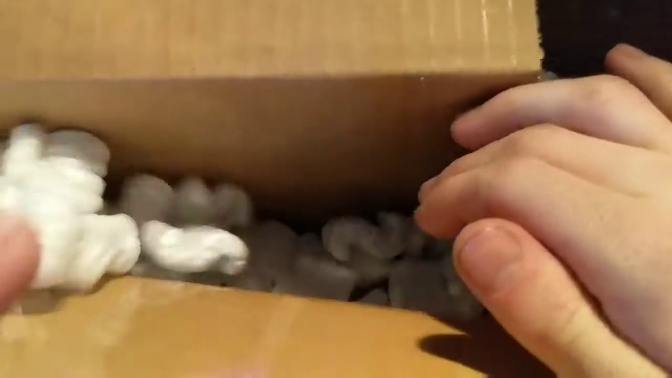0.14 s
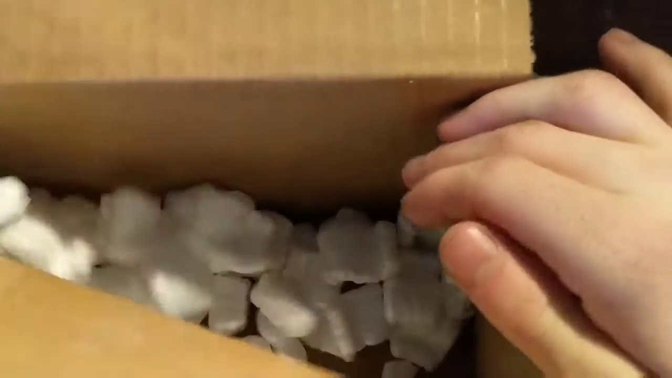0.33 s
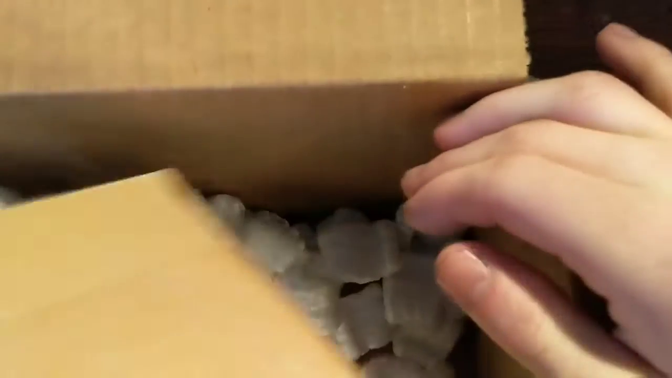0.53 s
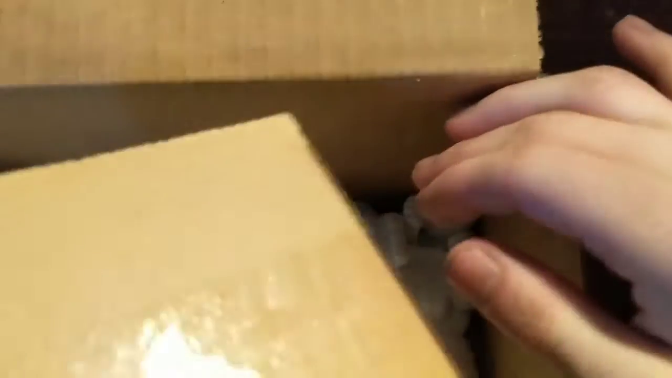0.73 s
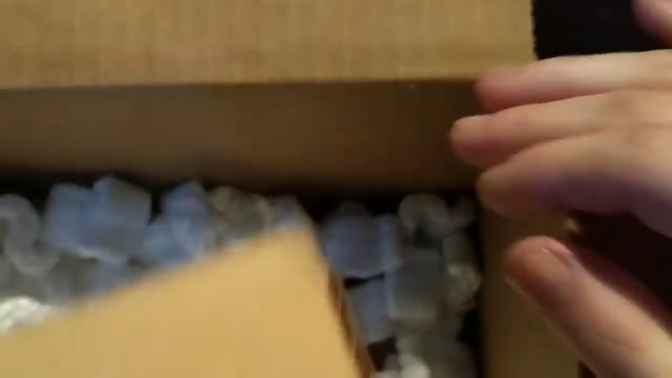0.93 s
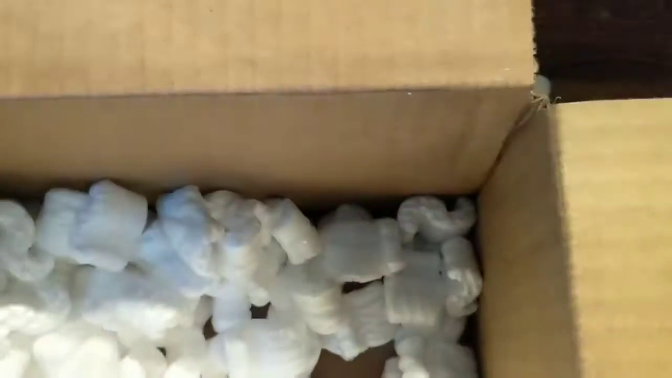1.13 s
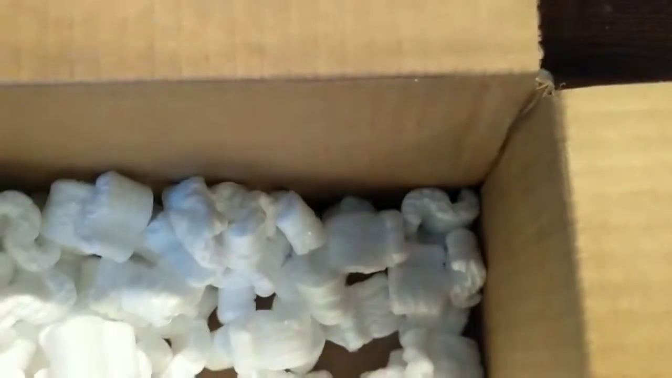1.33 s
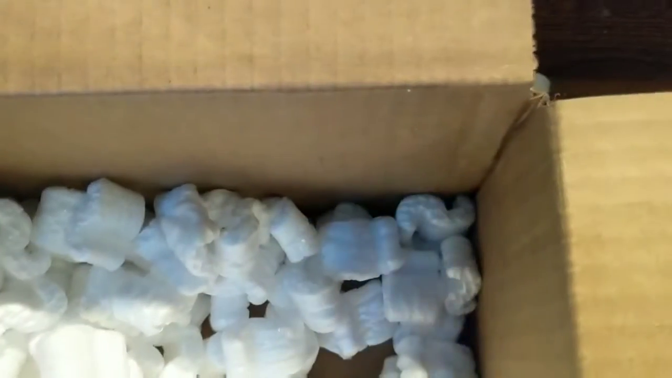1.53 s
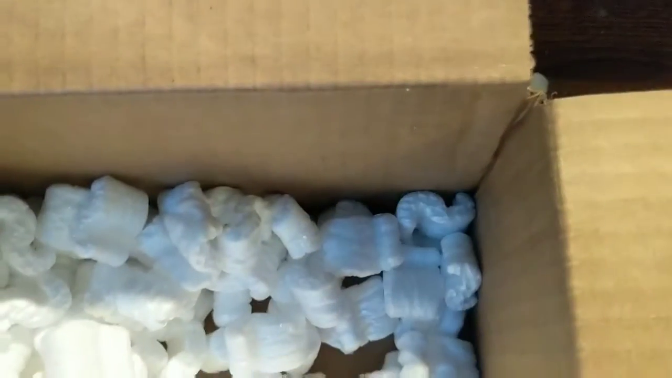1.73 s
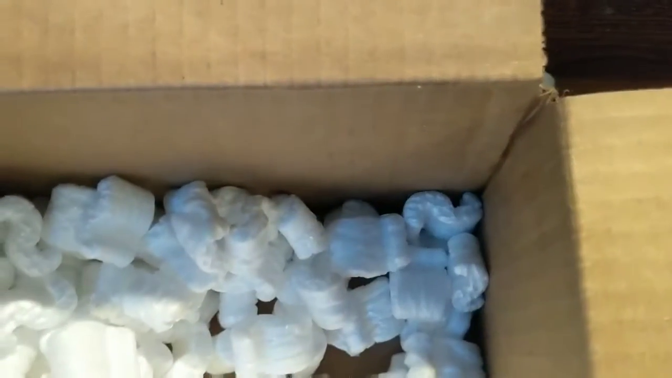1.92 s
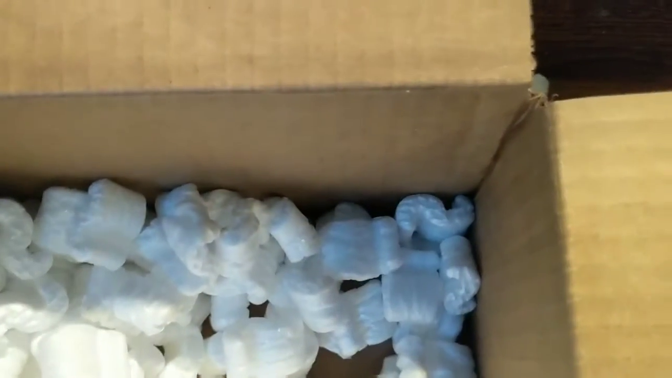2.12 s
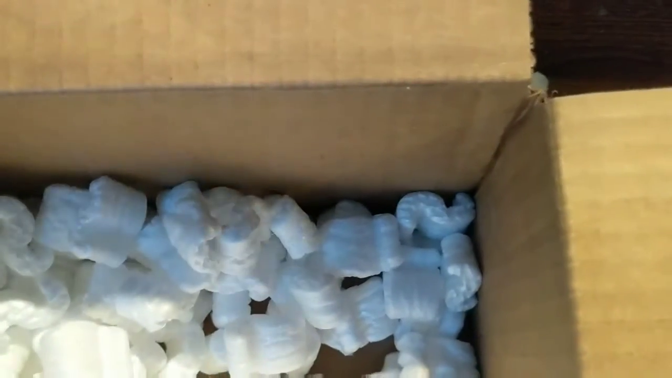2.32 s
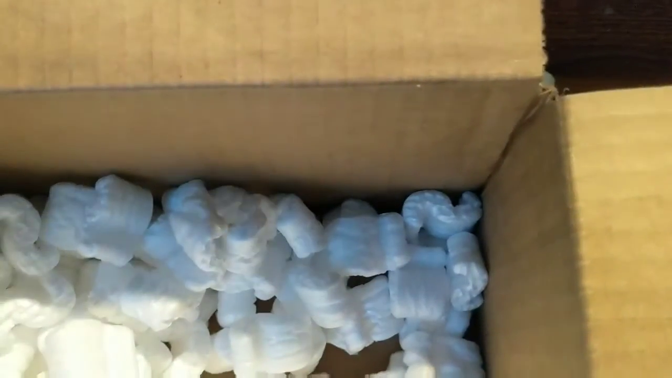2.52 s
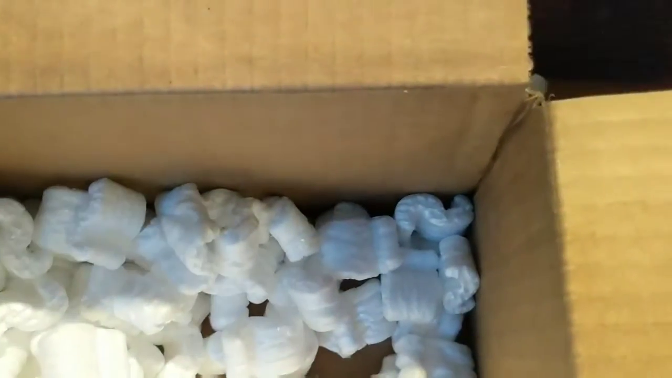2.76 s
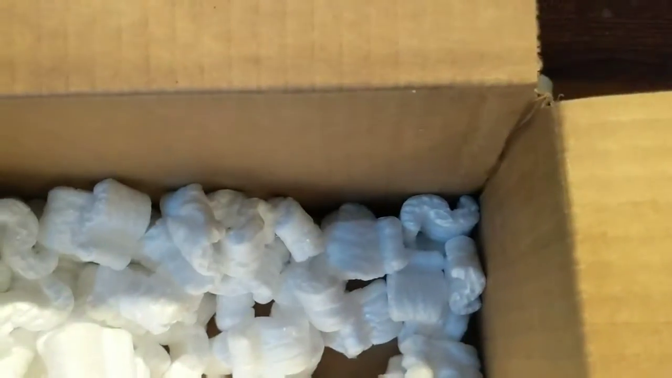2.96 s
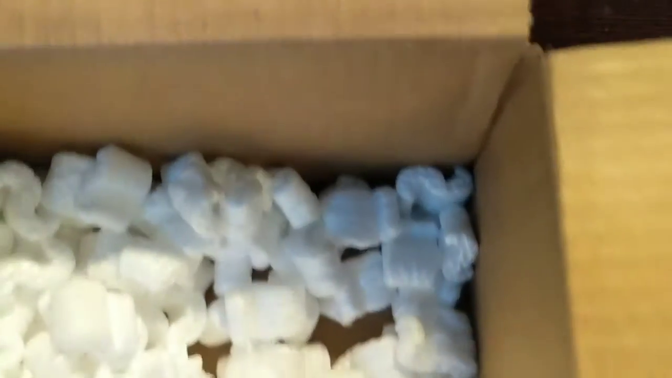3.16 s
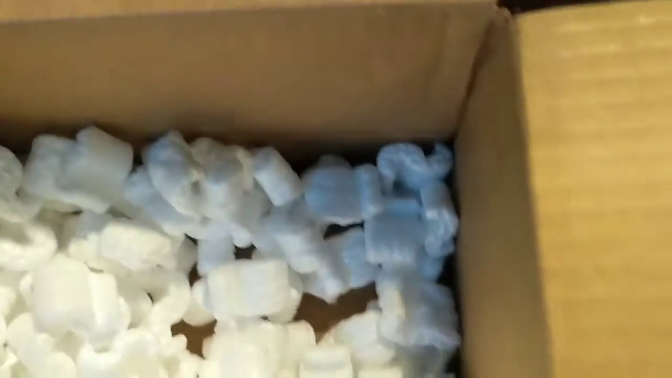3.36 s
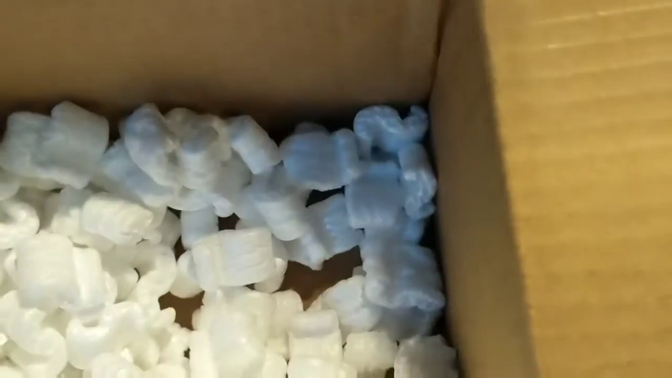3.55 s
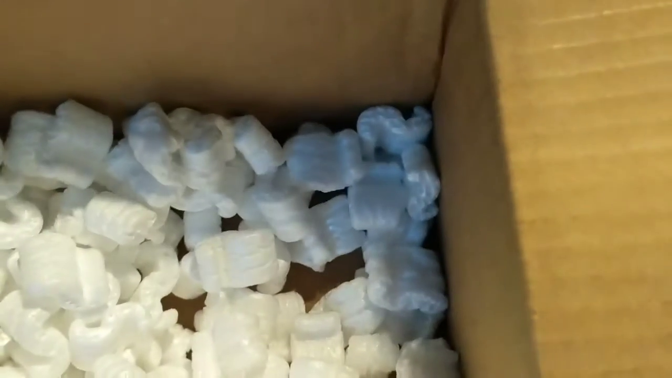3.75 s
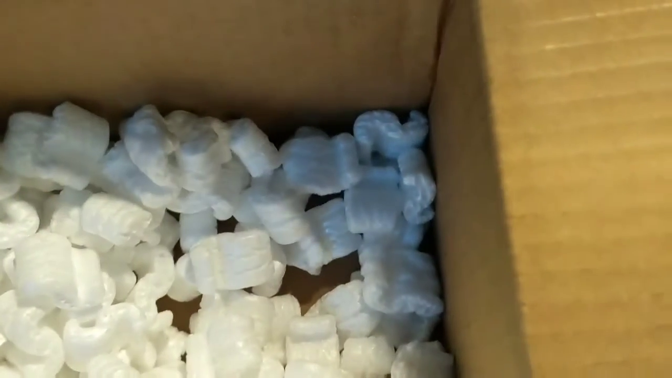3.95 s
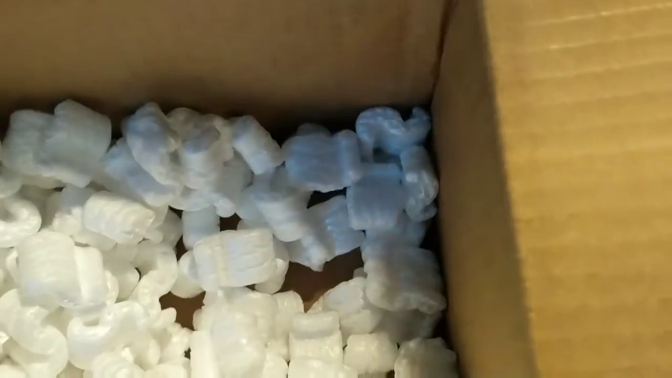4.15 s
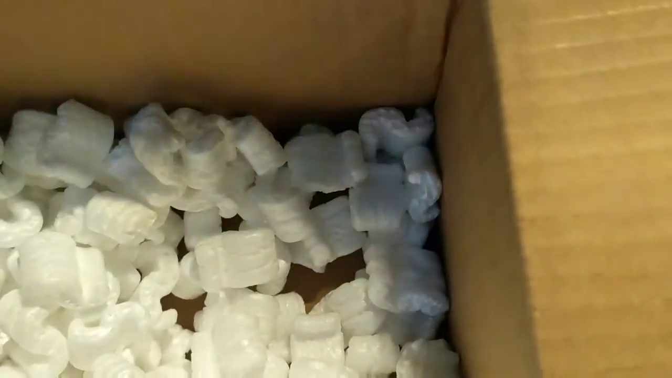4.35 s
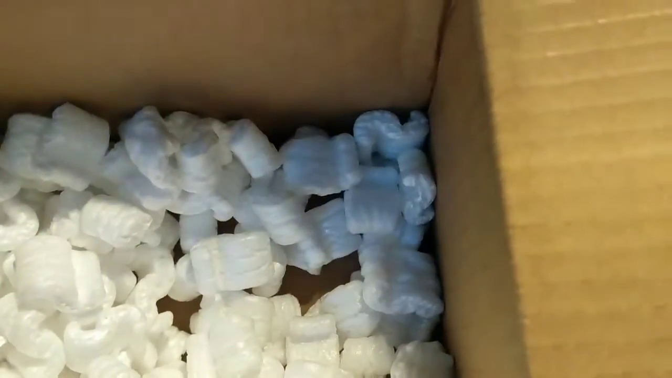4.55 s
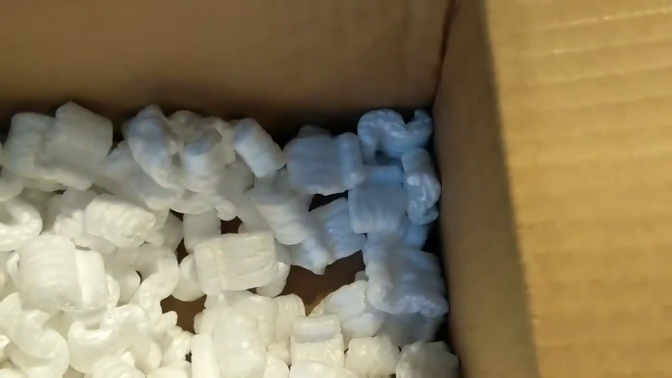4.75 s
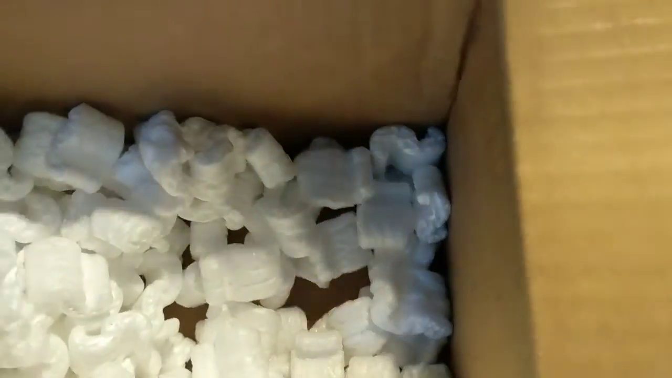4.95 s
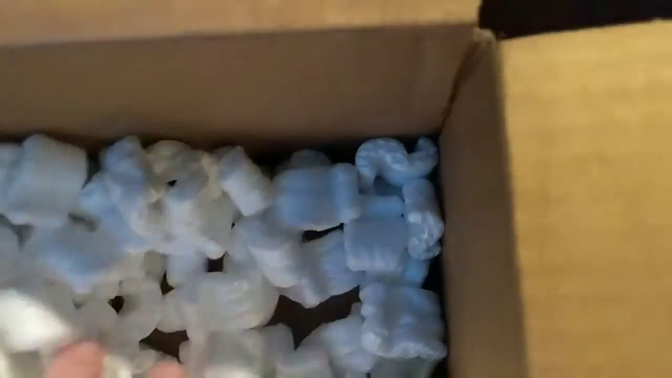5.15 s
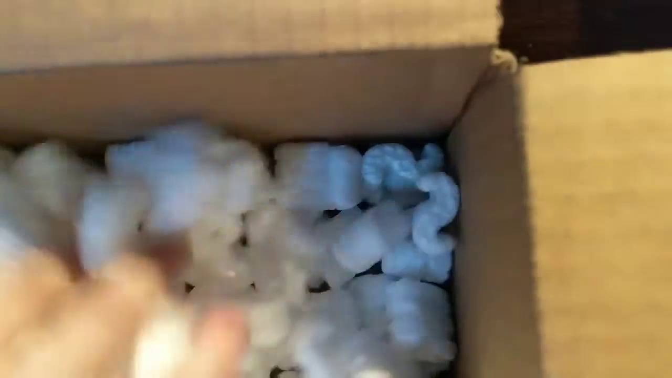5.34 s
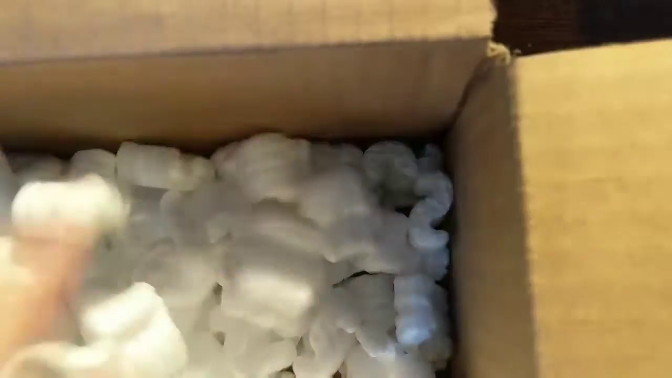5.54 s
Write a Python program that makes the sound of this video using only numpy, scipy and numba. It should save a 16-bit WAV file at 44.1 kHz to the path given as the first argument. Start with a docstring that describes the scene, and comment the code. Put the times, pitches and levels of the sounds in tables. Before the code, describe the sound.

Close to the microphone in a quiet room, a hand scoops foam packing peanuts with dense crackling and squeaks, then a cardboard flap moves with dull knocks. Sound thins to faint ticks of settling pieces over low room hush. Past three seconds the box shifts with low thumps; near five the hand returns, bright rustle swelling to loud crunching, snaps and knocks.

```python
"""Stirring foam pieces in a cardboard box

A hand stirs foam packing peanuts in a cardboard box, heard from close by in a quiet room.
Foam rubbing on foam is a dense sum of decaying stick-slip sines; snaps, squeaks and knocks are
bursts of band-limited noise; the walls are low damped resonances driven by uneven pushes.
A steady hush and a short, dull reverberant tail make up the room."""
import sys
import numpy as np
from scipy import signal
from scipy.fft import rfft, irfft
from scipy.io import wavfile
from scipy.ndimage import uniform_filter1d
from numba import njit

SR = 44100
rng = np.random.default_rng(int(sys.argv[2]) if len(sys.argv) > 2 else 0)


def output_pcm(signal):
    """Save a mono or channel-first signal as 16-bit PCM at the path in sys.argv[1].

    Samples are clipped to [-1, 1] before scaling.
    """
    pcm = np.clip(np.atleast_2d(signal).T, -1, 1) * 32767
    wavfile.write(sys.argv[1], SR, np.round(pcm).astype(np.int16))


def ratio_of_db(decibels):
    """Turn decibels (scalar or array-like) into linear amplitude factors; 0 dB maps to 1."""
    return 10 ** (np.asarray(decibels, float) / 20)


N = 250488
T = np.arange(N) / SR

# Spectrum of the room's hush: (frequency [Hz], relative level per Hz [dB])
HUSH_SPECTRUM = [(18, -21), (30, 2), (134, 4), (189, 1.5), (328, -1), (1350, -10.5), (1720, -10.5),
                 (2980, -14.5), (6210, -22), (12000, -18.5), (16000, -21.5)]
# Resonances of the flexing walls: (frequency [Hz], width [Hz], relative level [dB])
WALL_MODES = [(117, 57, -3.5), (137, 34, -8.5), (175, 28, 2.5), (207, 38, 0)]
# Resonances of the whole box rocking on the table: (frequency [Hz], width [Hz], relative level [dB])
ROCKING_MODES = [(58, 14, -4), (80, 11, -4)]
# Course of the rocking: (time [s], level [dB])
ROCKING_LEVEL = [(0.0, -61), (0.55, -48), (0.68, -60.5), (2.89, -74.5), (3.15, -54.5), (3.24, -33.5),
                 (3.39, -46.5), (3.64, -44.5), (3.81, -55), (3.97, -41), (4.0, -51), (4.68, -74),
                 (4.78, -48), (4.84, -56), (4.98, -35), (5.03, -59), (5.09, -37), (5.16, -47), (5.6, -37),
                 (5.68, -63)]
# Blows that shake the walls: (time [s], level [dB], pitch [Hz])
WALL_BLOWS = [(0.096, -39, 177), (.27, -34, 66), (0.403, -28, 154), (0.464, -21.5, 183),
              (0.488, -21.5, 175), (0.508, -18.5, 137), (0.523, -30, 101), (1.044, -43.5, 122),
              (1.089, -40, 207), (1.114, -38.5, 150), (1.531, -46, 132), (1.674, -56, 290),
              (3.051, -45, 101), (3.164, -38, 175), (3.188, -33, 87), (3.218, -23.5, 140), (3.234, -17, 78),
              (3.3, -36, 72), (3.603, -26, 207), (3.611, -19.5, 135), (3.655, -31, 149), (3.859, -34, 56.5),
              (3.948, -28, 74.5), (3.96, -33.5, 188), (4.035, -41, 130), (4.189, -52, 100),
              (4.282, -41, 59.2), (4.759, -36, 77), (4.88, -40, 80), (4.948, -33, 70.5), (5.064, -28, 95),
              (5.089, -28, 64.6), (5.278, -19.5, 197.5), (5.424, -17, 213), (5.47, -21, 304)]
# Spectral weighting of scraped cardboard: (frequency [Hz], relative level per Hz [dB])
CARD_SPECTRUM = [(140, -39), (230, -2.5), (392, 3.5), (446, 2.5), (646, 0), (1020, -3), (1430, -5),
                 (1800, -19.5), (2340, -27), (3960, -120)]
# Knocks on the cardboard: (time [s], peak [dB], centre frequency [Hz], width [octaves])
CARD_KNOCKS = [(0.173, -31, 1150, 0.38), (0.366, -26, 1410, 0.29), (0.45, -39, 493, 0.45),
               (0.487, -32, 495, 0.77), (0.535, -21, 650, 0.9), (0.575, -40, 318, 0.45),
               (0.605, -34, 393, 0.49), (0.643, -36, 568, 0.52), (0.691, -22.5, 1040, 0.28),
               (0.792, -32, 375, 0.81), (0.854, -34.5, 266, 0.45), (0.883, -43, 299, 0.49),
               (0.923, -45, 261, 0.41), (0.982, -45, 620, 0.61), (1.079, -49, 1150, 0.54),
               (1.115, -40, 460, 0.38), (1.171, -53, 455, 0.45), (1.23, -58, 470, 0.45),
               (1.534, -34, 925, 0.61), (1.677, -45, 424, 0.35), (1.793, -41, 1050, 0.66),
               (1.848, -42.5, 910, 0.51), (2.27, -32, 745, 0.38), (2.336, -41, 1540, 0.49),
               (2.357, -41, 806, 0.42), (2.396, -35.5, 850, 0.23), (2.492, -43, 1540, 0.58),
               (2.732, -44, 767, 0.4), (3.053, -45.5, 363, 0.62), (3.164, -44, 377, 0.35),
               (3.192, -42, 706, 0.45), (3.215, -31, 1410, 0.88), (3.42, -35, 361, 0.33),
               (3.521, -34, 247, 0.26), (3.603, -18.5, 394, 0.2), (3.76, -37, 363, 0.23),
               (3.944, -29.5, 350, 0.61), (4.041, -41.5, 368, 0.53), (4.091, -46, 360, 0.33),
               (4.731, -44.5, 533, 0.34), (4.79, -32.5, 1240, 0.28), (4.836, -37, 471, 0.28),
               (4.917, -25, 526, 0.23), (5.065, -43, 522, 0.29), (5.104, -33.5, 373, 0.53),
               (5.167, -42, 371, 0.45), (5.225, -33, 366, 0.41), (5.282, -17, 367, 0.38),
               (5.341, -13, 1060, 0.56), (5.373, -14.5, 670, 0.86), (5.425, -19.5, 720, 0.38),
               (5.48, -17, 363, 0.73), (5.505, -17, 630, 0.2), (5.532, -15, 740, 0.57),
               (5.566, -18, 533, 0.55), (5.582, -19, 480, 0.45)]
# Foam squeaking on one pitch: (time [s], peak [dB], centre frequency [Hz], t60 [s])
FOAM_SQUEAKS = [(.09, -28, 7870, 0.35), (.115, -27.5, 3620, 0.24), (.12, -29.5, 2850, 0.23),
                (.2, -26, 7800, .5), (.33, -21.5, 7740, 0.23), (.32, -23, 6540, 0.34),
                (0.173, -26, 1183, 0.029), (0.541, -27.5, 3310, 0.058), (.583, -36, 3820, 0.078),
                (.688, -38, 2900, 0.083), (.688, -38, 3620, 0.11), (.739, -41, 1840, 0.024),
                (.792, -41.5, 4700, 0.054), (.882, -39.5, 1104, 0.021), (1.045, -50, 3720, .083),
                (1.175, -49, 471, 0.21), (1.226, -48, 472, 0.13), (1.335, -55, 5100, .076),
                (1.426, -56, 7330, .092), (1.536, -48, 4580, .05), (3.722, -38.5, 1360, 0.045),
                (4.091, -48.5, 369, 0.11), (3.9, -35, 6350, .06), (4.83, -27, 6800, 0.14),
                (4.845, -25, 7900, 0.14), (5.345, -19, 3570, 0.11), (5.41, -20, 6900, .15),
                (5.504, -25, 6500, .027), (5.533, -26, 3200, .04), (5.563, -20.5, 5300, 0.014)]
# Wide snaps: single foam pieces slipping and, in the rows centred low (about 1-2 kHz), ticks on the cardboard:
# (time [s], peak [dB], centre frequency [Hz], width [octaves], t60 [s])
SNAPS = [(0.1024,-15.5,8100,1.5,.02),(.1455,-20,6000,1.5,.015),(.3505,-13,7100,1.5,.02),(0.5435,-22,3400,2.3,.03),(0.5855,-15,9500,1.2,.011),(.6063,-19,5000,4.4,0.045),
         (.6433,-25,9590,3.4,0.088),(.6548,-18.5,9540,2,0.0063),(0.6804,-27,1500,2.6,0.044),(0.7835,-30,3000,4.2,0.053),
         (0.8382,-34,11000,3,0.072),(.8837,-36,1200,1.7,0.12),(0.9794,-41,1200,1.1,0.04),(1.0122,-45,1400,1.7,.07),(1.0461,-47,3560,1.5,.08),
         (1.08,-32.5,1500,1.7,0.047),(1.117,-27,1500,1.16,.012),(1.2306,-41,2000,3,0.093),(1.324,-36.5,8480,1.6,0.033),
         (1.3423,-44,7970,1.4,.034),(1.4117,-41.5,7550,1.9,0.011),(1.4244,-47,7300,1.4,0.076),(1.5328,-37,3000,2.5,.05),
         (1.5378,-36,1010,1,0.025),(1.6763,-46.5,1500,1,0.083),(1.9019,-49,1530,1.7,.018),(2.0056,-44,8510,2.6,.011),
         (2.0229,-45.5,2500,1.8,0.018),(2.043,-45,12800,3.3,0.022),(2.0868,-42,1530,2.1,0.0081),(2.1363,-41,1980,1.7,0.013),
         (2.27,-29.5,1500,2.5,0.073),(2.3373,-33,3000,3,0.069),(2.3689,-26,4030,1.5,.065),(2.3932,-29.5,4770,1.3,0.099),
         (2.499,-39,1500,3.1,0.17),(2.5909,-42,2780,2.4,0.067),(2.6506,-42.5,3920,1,.025),(2.7084,-33.5,8830,1.6,0.014),
         (2.732,-39,1450,2.2,.025),(2.7694,-52,4930,1.3,.028),(2.9088,-50,9570,2.4,0.015),(2.9404,-30.5,10600,1.7,0.013),
         (3.0532,-39,2500,3.3,0.083),(3.2156,-29,1800,1.7,0.026),(3.2288,-28,2300,1.5,0.033),(3.2425,-22,1860,0.28,.018),(3.2522,-28,2260,0.3,0.036),
         (3.4294,-30.5,1220,0.87,0.12),(3.5875,-11.5,4030,.6,0.011),(3.6468,-30,3000,3.2,0.21),(3.7582,-31,3000,2.3,0.062),
         (3.778,-32,1930,2.5,0.017),(3.9022,-30,6590,1.9,0.069),(3.936,-29,2000,3,.072),(4.0547,-45,3000,3.5,.12),
         (4.2732,-54,10000,2,.03),(4.3275,-51,10000,2.5,0.065),(4.5137,-50.5,9660,1.6,.1),(4.5538,-34.5,10900,.9,0.0077),
         (4.6008,-41,12300,1.7,0.047),(4.6244,-42.5,14000,1.8,0.079),(4.73,-28,12000,1.7,.012),(4.7893,-28,9770,1.5,.05),
         (4.8455,-11,11400,1.8,0.17),(4.915,-16,9750,3.3,0.07),(4.9527,-24,8890,2.4,.015),(4.9704,-26,9510,2.2,0.036),
         (5.0045,-26,9690,1.3,0.023),(5.0346,-31.5,9350,3,0.042),(5.0666,-24,2500,2.4,0.013),(5.0837,-27,1820,2.4,0.013),
         (5.1049,-23.5,1300,0.95,0.027),(5.1614,-29,1240,1.1,0.12),(5.1878,-20,10000,2.2,0.13),(5.2081,-12.5,10800,2.3,0.17),
         (5.2835,-5,1060,0.49,0.011),(5.3427,-3,6370,0.83,0.014),(5.364,-18,9530,2.1,0.057),(5.3745,-12,4500,2,0.014),(5.428,-12,5000,2.5,0.013),(5.4805,-9,3000,2.5,.02),(5.505,-14,2000,3.3,0.016),
         (5.5336,-10.5,9000,2.5,0.015),(5.5643,-13,5280,1.8,0.011),(5.6332,-22.5,1500,2.4,.034),(5.6487,-22,11200,2.3,0.12)]
# Spectral weighting of rubbed foam: (frequency [Hz], relative level per Hz [dB])
FOAM_SPECTRUM = [(700, -18), (1200, -10), (2400, -5), (3500, -5.5), (5000, -5.5), (7000, -5), (10000, -4),
                 (16500, -8.5)]
# The heap settling while no hand is in it:
# (start [s], length [s], foam level [dB], pressure on the box [dB])
SETTLINGS = [(1.292, 0.036, -61, -64), (1.404, 0.037, -70, -76), (1.516, 0.019, -55, -47),
             (1.658, 0.086, -61.5, -58), (1.755, .11, -54.5, -58), (2.0, 0.14, -69, -69),
             (2.255, 0.013, -45.5, -51), (2.339, 0.065, -46, -57), (2.45, 0.14, -57, -68),
             (2.639, 0.13, -56, -66.5), (2.89, 0.087, -57.5, -64), (3.033, 0.096, -59, -62.5),
             (4.1, 0.15, -69, -64.5), (4.258, 0.079, -65, -65.5), (4.488, 0.19, -62, -68),
             (4.674, .03, -68, -61)]
# The hand's work, one table a gesture (scoop, flap lifted, flap dropped, box shifted, box let go,
# hand lands, gropes, digs): (time [s], foam stirred [dB], box pressed [dB])
GESTURES = [
    [(0.0, -36, -37), (0.112, -24.5, -37.5), (0.19, -29, -36.5), (0.232, -23, -33.5), (0.29, -27.5, -35.5),
     (0.362, -23, -35), (0.408, -24, -33), (0.425, -34.5, -43)],
    [(0.43, -33.5, -45), (0.472, -34, -36.5), (0.618, -42.5, -40), (0.632, -36.5, -44.5),
     (0.698, -39.5, -34.5), (0.738, -46, -50.5), (0.928, -49, -52.5), (0.96, -51, -60)],
    [(0.965, -60, -65), (0.991, -55.5, -54), (1.037, -56.5, -63), (1.123, -48.5, -44), (1.157, -49.5, -59),
     (1.251, -57, -56.5), (1.261, -66, -61), (1.3, -58, -81)],
    [(3.15, -59, -67), (3.194, -51.5, -51.5), (3.244, -33, -37), (3.296, -43, -43), (3.368, -46, -50),
     (3.436, -41.5, -38), (3.58, -44, -47), (3.585, -28, -36)],
    [(3.59, -30, -58), (3.602, -43, -43.5), (3.714, -50.5, -50), (3.722, -47, -50.5), (3.926, -47, -53.5),
     (3.944, -41.5, -38), (4.024, -56.5, -56), (4.12, -67, -60)],
    [(4.715, -47, -63), (4.797, -31, -46), (4.823, -34, -52), (4.841, -26.5, -47), (4.859, -33, -42),
     (4.907, -31.5, -50.5), (4.923, -33, -38), (4.94, -42, -48)],
    [(4.945, -42.5, -45), (5.007, -42.5, -46), (5.059, -54, -57), (5.065, -46, -51), (5.093, -47, -47),
     (5.105, -37.5, -41), (5.139, -52, -50), (5.16, -50, -43)],
    [(5.165, -40, -34.5), (5.223, -28.5, -32.5), (5.293, -22.5, -31), (5.329, -25.5, -42),
     (5.343, -18, -29.5), (5.411, -19.5, -30.5), (5.485, -22, -25), (5.68, -41.5, -42)],
]
# Tilt of the rustle in each gesture: (slope [dB per octave]); fingers in the foam are bright,
# a shifted heap dull
GESTURE_SLOPES = [-1.5, -1, -2.5, -5, -2, 0.7, -3.5, 0.14]
# Response of the microphone and its port: (frequency [Hz], gain [dB])
MIC_RESPONSE = [(25, -12), (55, -2.5), (3000, -2.5), (6800, 1.5), (7750, 3), (8500, -3), (15300, -6),
                (15900, -10), (16200, -60)]


def amp_response(hz, points):
    """A spectral weighting is linear in dB over the logarithm of frequency."""
    table_hz, db = np.transpose(points)
    return ratio_of_db(np.interp(np.log(hz), np.log(table_hz), db))


def response(x, points):
    """A linear filter multiplies each spectral component by its gain."""
    f = np.maximum(np.arange(x.shape[-1] // 2 + 1) * SR / x.shape[-1], 1)
    return irfft(rfft(x) * amp_response(f, points), x.shape[-1])


def colour(x, points):
    """Filtering colours a noise; division by its rms then sets unit power."""
    y = response(x, points)
    return y / np.sqrt(np.mean(y ** 2))


def walk(rate):
    """Irregular motion as random levels held for 1 / rate seconds and smoothed twice."""
    k = int(SR / rate)
    held = np.repeat(rng.standard_normal(N // k + 1), k)
    return 0.47 * uniform_filter1d(uniform_filter1d(held, k), k)[:N]


@njit
def grains(start, hz, fade, size, n):
    """A released slip rings as a sine with exponential decay: `fade` nepers per sample."""
    out = np.zeros(n + 4000)
    for g in range(len(start)):
        turn = np.exp(complex(-fade[g], 2 * np.pi * hz[g] / SR))
        z = complex(size[g], 0.)
        for i in range(min(int(6 / fade[g]), 3999)):
            z *= turn
            out[start[g] + i] += z.imag
    return out[:n]


def slips(count, lo_hz, hi_hz, points, cycles, spread_db, flurry_db, piece_db, tilt):
    """Stick-slip friction is a sum of many brief releases, a few far larger than the rest."""
    when, where, ring, big = rng.random((count, 4)).T
    start = (when * N).astype(np.int64)
    hz = lo_hz + where * (hi_hz - lo_hz)
    fade = hz / SR / (cycles * 4 ** (2 * ring - 1))
    # slips come in quick flurries, and each rubbing piece favours its own pitch for a while
    walks = np.array([walk(25) for _ in range(16)])
    pieces = walks[(16 * where ** .7).astype(int), start]
    db = -spread_db * np.log(1 - big) + flurry_db * walk(120)[start] + piece_db * pieces
    even = ratio_of_db(db) * np.sqrt(fade)  # equal energy for long and short rings
    lean = ratio_of_db(tilt[start] * np.log2(hz / hi_hz * 3))
    y = response(grains(start, hz, fade, even * lean, N), points)
    # a decaying sine holds size ** 2 / (4 fade); the tilt is left out of this power
    plain = np.sum(even ** 2 / fade)
    power = plain / N * np.mean(amp_response(hz, points) ** 2) / 4
    return y / np.sqrt(power)


def bursts(rows, widths, t60s, rises, crack):
    """An impact excites a band of noise that rises and decays; a sudden one opens with a crack."""
    size, crack_rise_s = 8192, 0.0012
    out = np.zeros(N + size)
    t = np.arange(size) / SR
    octave = np.log2(np.maximum(np.arange(size // 2 + 1) * SR / size, 1))
    noises = rng.standard_normal((len(rows), size))
    for (s, db, hz), width, t60, rise, noise in zip(rows, widths, t60s, rises, noises):
        band = np.exp(-.5 * ((octave - np.log2(hz)) / max(width, .03)) ** 2)
        tone = irfft(rfft(noise) * band)
        click = np.roll(irfft(band), 8)
        shape = (1 - np.exp(-t / max(rise, 1e-4))) * 1000. ** (-t / max(t60, .003))
        heard = np.sqrt(np.sum((tone * shape) ** 2) / np.sum(shape ** 2))  # rms of the part that sounds
        suddenness = np.exp(-(rise / crack_rise_s) ** 2)
        sound = tone / heard * shape / shape.max()
        sound = sound + crack * suddenness * click / click.max() * (t < .002)
        i = int(s * SR)
        out[i:i + size] += ratio_of_db(db) * sound / np.abs(sound).max()
    return out[:N]


def sway(modes, push_db):
    """Uneven pushes excite a few low, damped modes, each a resonant filter applied twice."""
    push, out = rng.standard_normal(N) * ratio_of_db(2.15 * walk(25)), 0
    for hz, width, db in modes:
        b, a = signal.iirpeak(hz, hz / width, SR)
        out = out + ratio_of_db(db) * signal.lfilter(b, a, signal.lfilter(b, a, push))
    return out / out.std() * ratio_of_db(push_db)


def motion():
    """Powers add: gestures and settlings give foam and pressure levels [dB] and a tilt [dB/octave]."""
    settle_rise_s, settle_fall_db_per_s = 0.023, 207
    power, tilt = np.full((2, N), 1e-9), -3  # the tilt between gestures
    for gesture, lean in zip(GESTURES, GESTURE_SLOPES):
        s, *columns = np.transpose(gesture)
        power = power + [ratio_of_db(np.interp(T, s, c, -120, -120)) ** 2 for c in columns]
        tilt = np.where((T >= s[0]) & (T <= s[-1]), lean, tilt)
    for s, length, *db in SETTLINGS:
        rise = np.clip((T - s) / settle_rise_s, 0, 1)
        shape = rise * ratio_of_db(-settle_fall_db_per_s * np.maximum(T - s - length, 0))
        power = power + np.outer(ratio_of_db(np.array(db)), shape) ** 2
    # levels are averaged over 10 ms, so stretches join smoothly
    foam_db, press_db = 10 * np.log10(uniform_filter1d(power, size=SR // 100) + 1e-10)
    return foam_db, press_db, tilt


def room_hush():
    """The background is stationary coloured noise whose level wanders slowly about -59.5 dB."""
    return colour(rng.standard_normal(N), HUSH_SPECTRUM) * ratio_of_db(-59.5 + 1.5 * walk(3.26))


def room(x):
    """Reverberation is convolution with an exponentially decaying noise: a short, dull tail."""
    t60_s, echo_db = 0.22, -15.5
    t = T[:SR // 2]
    noise = colour(rng.standard_normal(len(t)), [(100, 2.0), (2000, 3), (16000, -4)])
    tail = noise * 1000. ** (-t / t60_s) * (t > .004)
    return x + ratio_of_db(echo_db) * signal.fftconvolve(x, tail / np.sqrt(np.sum(tail ** 2)))[:N]


def walls(press_db):
    """Forced modes flex the walls and rock the box; each blow adds a freely decaying swing."""
    blow_t60_s, blow_rise_s = 0.14, 0.0028
    flexing = sway(WALL_MODES, press_db - 5.5)  # walls flex with the pressure
    out = flexing + sway(ROCKING_MODES, np.interp(T, *np.transpose(ROCKING_LEVEL)))
    for s, db, hz in WALL_BLOWS:
        t = np.maximum(T - s, 0)
        shape = (1 - np.exp(-t / blow_rise_s)) * 1000. ** (-t / blow_t60_s)
        out = out + ratio_of_db(db) * np.sin(2 * np.pi * hz * t) * shape
    return out


def cardboard_scrape(press_db):
    """Friction on cardboard is stick-slip at low pitches, scaled by the pressure on the box."""
    card = slips(count=24000, lo_hz=201.1, hi_hz=1983, points=CARD_SPECTRUM, cycles=4.4,
                 spread_db=2.7, flurry_db=1.5, piece_db=0.6, tilt=0 * T)
    return card * ratio_of_db(press_db)


def cardboard_knocks():
    """A struck panel answers with a short, damped band of noise."""
    t60_s, rise_s = 0.032, 0.0025
    rows, alike = np.array(CARD_KNOCKS), np.ones(len(CARD_KNOCKS))
    return bursts(rows[:, :3], rows[:, 3], t60_s * alike, rise_s * alike, crack=1.5)


def foam_squeaks():
    """Sustained stick-slip is heard on one pitch: a very narrow band of decaying noise."""
    width_octaves, rise_share = 0.052, 0.06  # rise as a share of t60
    rows = np.array(FOAM_SQUEAKS)
    widths, t60s = np.full(len(rows), width_octaves), rows[:, 3]
    return bursts(rows[:, :3], widths, t60s, rise_share * t60s, crack=0)


def foam_snaps():
    """A single piece let go by friction emits a wide burst, the quickest with a crack."""
    rise_share = 0.06  # of t60
    rows = np.array(SNAPS)
    t60s = rows[:, 4]
    return bursts(rows[:, :3], rows[:, 3], t60s, rise_share * t60s, crack=3.5)


def foam_rustle(foam_db, tilt):
    """Foam on foam is dense stick-slip: short rings, with a thinner layer of high quality factor."""
    foam = slips(count=90000, lo_hz=956, hi_hz=17060, points=FOAM_SPECTRUM, cycles=2.14,
                 spread_db=2.0, flurry_db=3.0, piece_db=5.0, tilt=tilt)
    # a thinner layer of slips rings for many cycles, as streaks of pitch in the rustle
    ringing = slips(count=6000, lo_hz=1010.0, hi_hz=9965, points=FOAM_SPECTRUM, cycles=35.0,
                    spread_db=2.0, flurry_db=-2.0, piece_db=4.5, tilt=tilt)
    return (foam + ratio_of_db(-9.5) * ringing) * ratio_of_db(foam_db)


def scene():
    """Superposition: box and foam sound in the room, over its hush; both channels are alike."""
    foam_db, press_db, tilt = motion()
    box = walls(press_db) + cardboard_scrape(press_db) + cardboard_knocks()
    foam = foam_squeaks() + foam_snaps() + foam_rustle(foam_db, tilt)
    return np.tile(room(box + foam) + room_hush(), (2, 1))


def low_pass(x):
    """Removes everything above the highest recorded frequency."""
    return signal.sosfilt(signal.butter(12, 16480, fs=SR, output="sos"), x)


def record(dry):
    """The microphone port is a resonance that lifts the sound just under 8 kHz; the top is lost."""
    mix = response(dry, MIC_RESPONSE)
    return low_pass(mix)


dry = scene()
out = record(dry)
output_pcm(out)
```